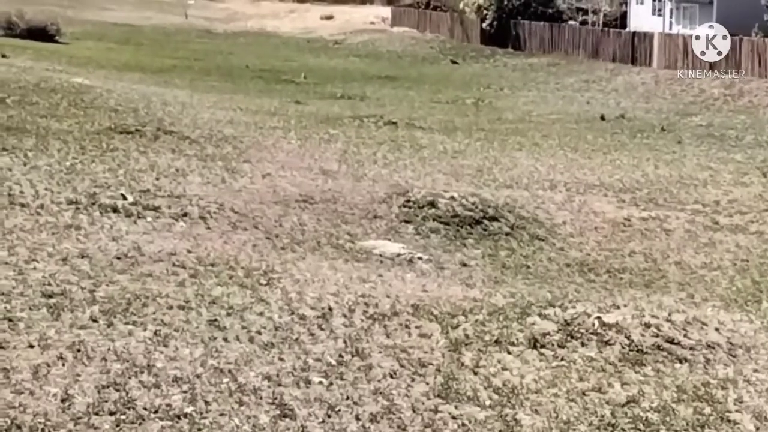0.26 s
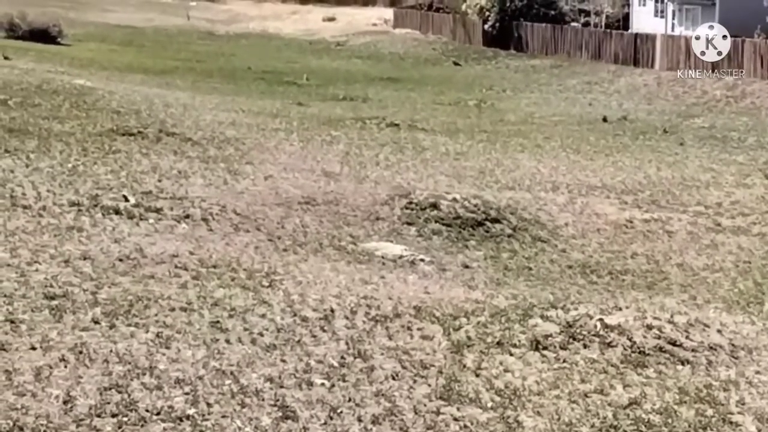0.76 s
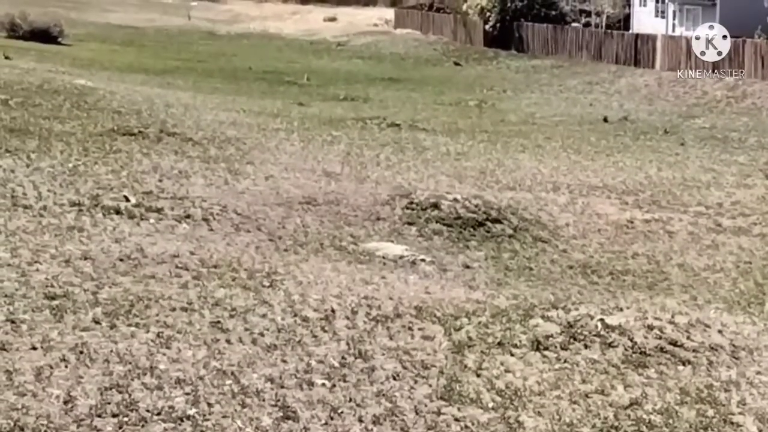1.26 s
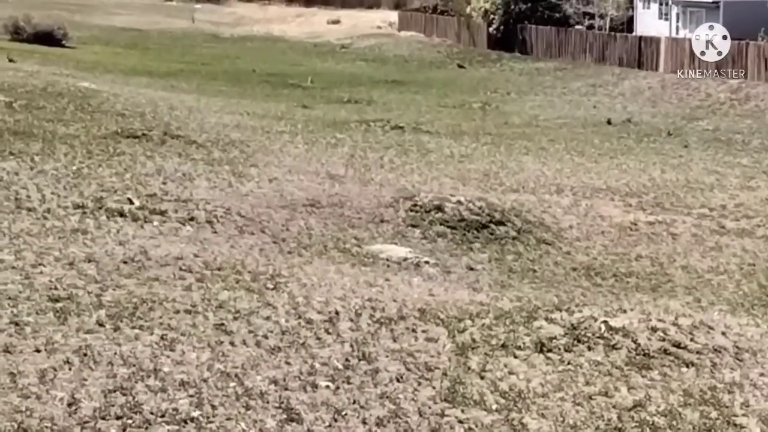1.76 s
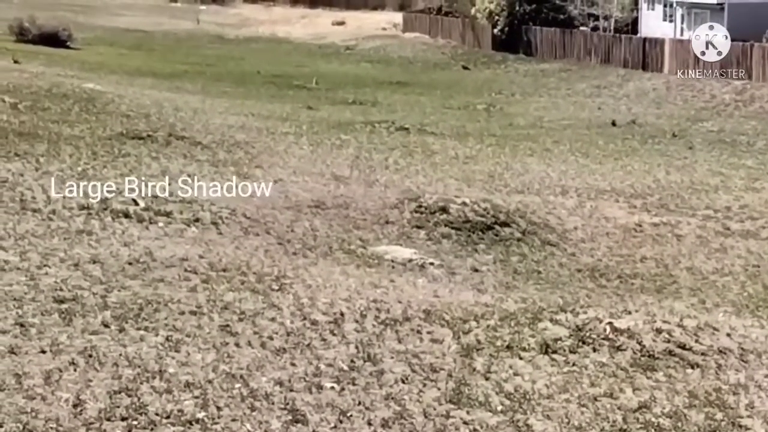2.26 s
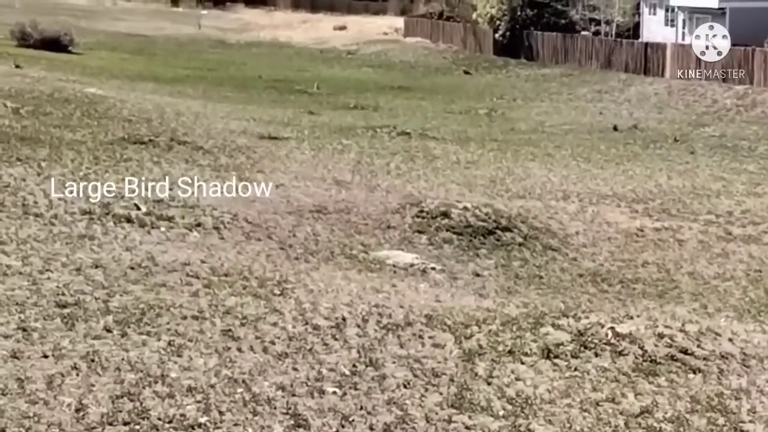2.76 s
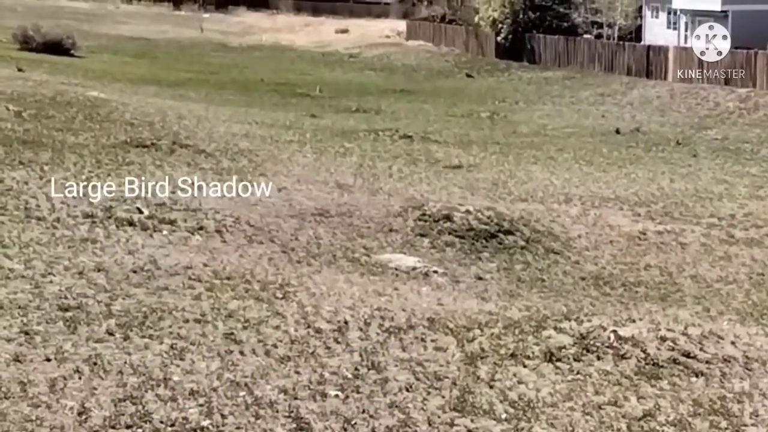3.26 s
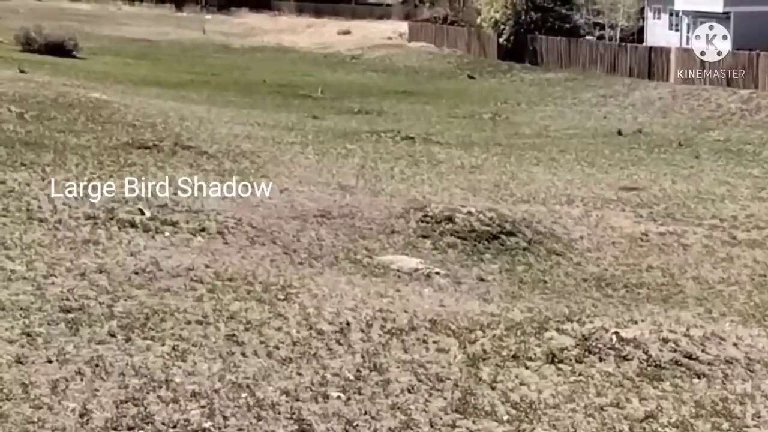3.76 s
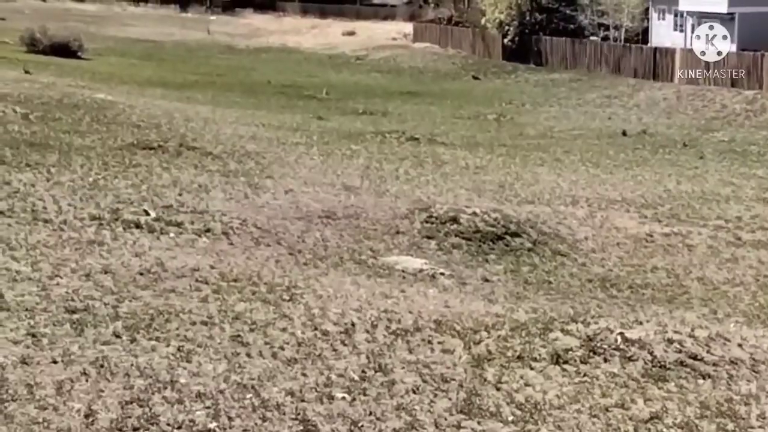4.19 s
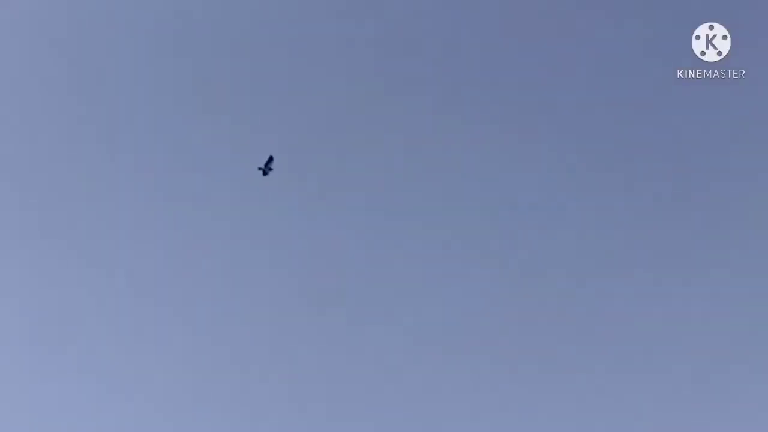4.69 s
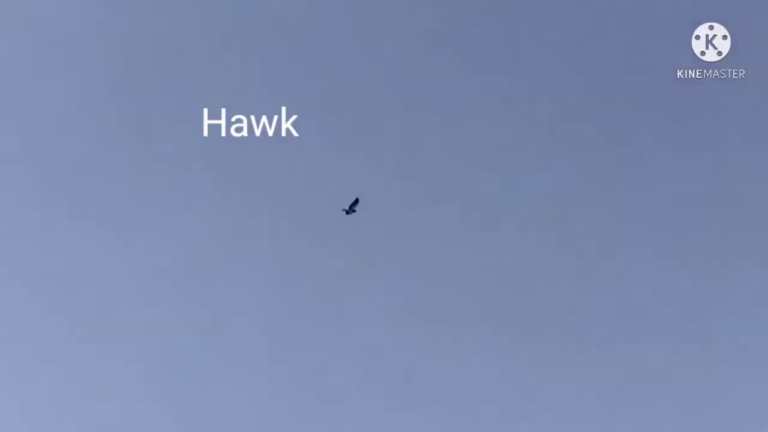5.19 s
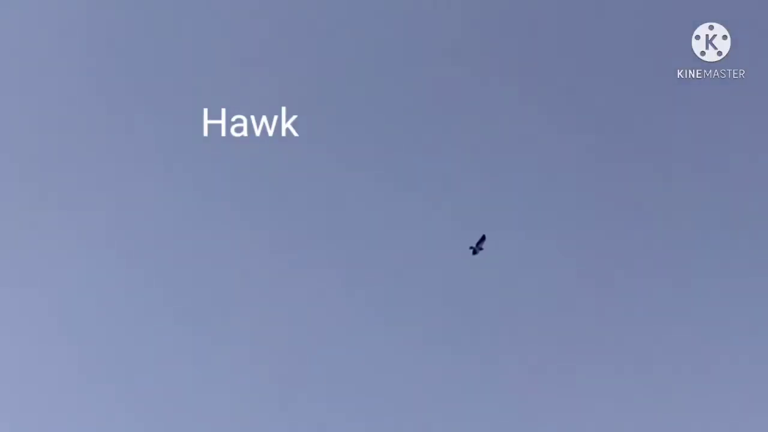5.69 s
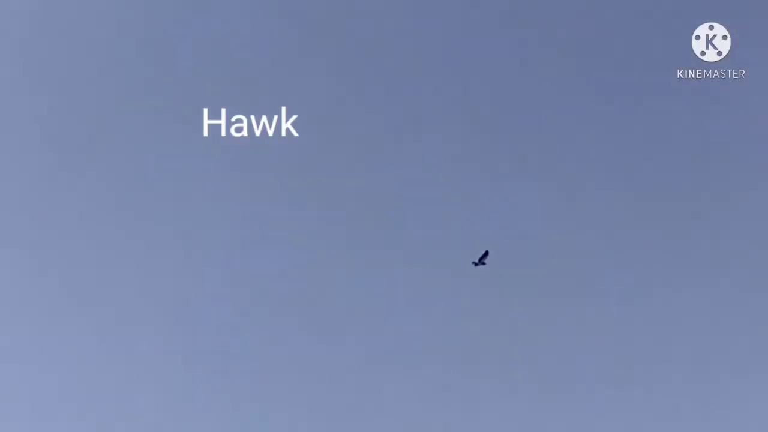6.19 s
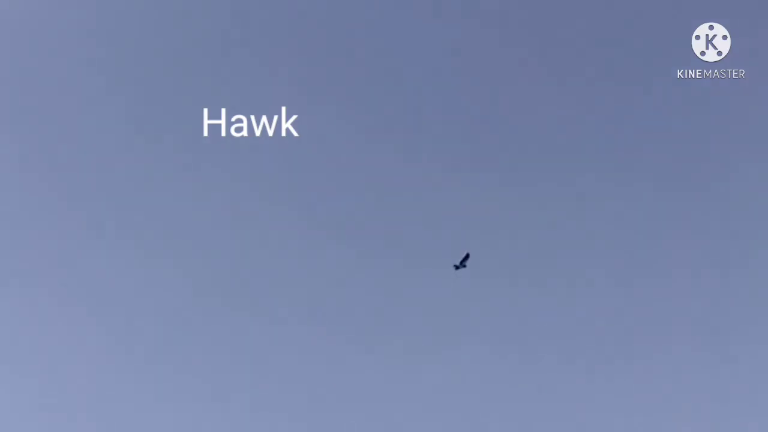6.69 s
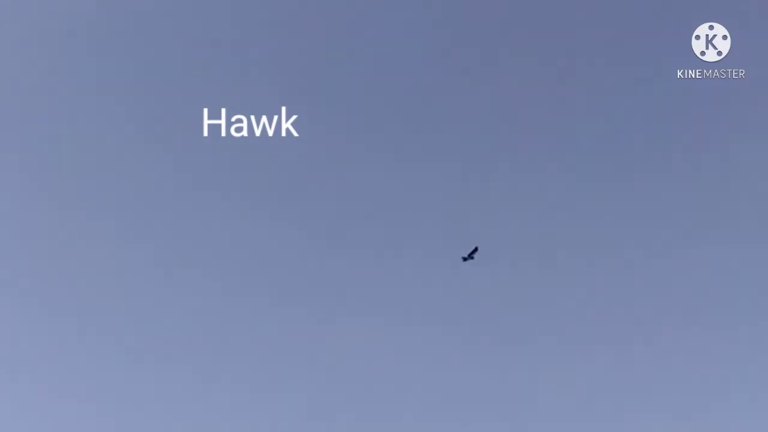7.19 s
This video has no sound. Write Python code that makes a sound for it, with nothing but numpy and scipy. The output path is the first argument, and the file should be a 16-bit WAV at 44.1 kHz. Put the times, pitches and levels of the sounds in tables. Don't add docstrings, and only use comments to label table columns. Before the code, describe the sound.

In an open grassy field, a small ground rodent repeats brief, high alarm barks, each about a tenth of a second with a falling end and faint echoes off fences and houses. Faint chirps answer from afar over a low road drone. Wind thumps the microphone, swelling into hard buffeting near the end.

```python
import sys
import numpy as np
from scipy import signal
from scipy.io import wavfile
from scipy.ndimage import uniform_filter1d

SR = 44100
rng = np.random.default_rng(int(sys.argv[2]) if len(sys.argv) > 2 else 0)


def store_wav(level_fs):
    pcm = np.round(np.clip(np.atleast_2d(level_fs), -1, 1) * 32767)
    wavfile.write(sys.argv[1], SR, pcm.T.astype(np.int16))


def volts_from_db(level):
    exponent = np.asarray(level, float) / 20
    return 10 ** exponent


N = 328412


def rms_one(x):
    return x / np.sqrt(np.mean(x ** 2) + 1e-20)


def in_time(rows):
    s, *columns = np.transpose(rows)
    return [np.interp(np.arange(N) / SR, s, c) for c in columns]


def drift(rate_hz):
    r = np.exp(-80 * np.pi * rate_hz / SR)
    slow = signal.lfilter([1], [1, -2 * r, r * r], rng.standard_normal(N // 40 + 2002))[2000:]
    return np.interp(np.arange(N) / 40, np.arange(len(slow)), rms_one(slow))


def butter(x, hz, kind, order=2):
    return signal.sosfilt(signal.butter(order, hz, kind, fs=SR, output="sos"), x)


def add(out, s, x):
    i = round(s * SR)
    out[i:i + len(x)] += x[:N - i]


def swells(rows, lull_db):
    s, spread_s, db = np.transpose(rows)[:3, :, None]
    t = np.arange(0, N, 40) / SR
    power = volts_from_db(2 * db) * np.exp(-2 * ((t - s) / spread_s) ** 2) + 1e-30
    level_db = 10 * np.log10(volts_from_db(2 * lull_db) + power.sum(axis=0))
    return np.interp(np.arange(N) / 40, np.arange(power.shape[1]), level_db), power


def patchy_noise(spectrum, patchy_db, rate_hz, count):
    hz, db = np.transpose(spectrum)
    edges = np.geomspace(hz[0], hz[-1], count)
    white, out = rng.standard_normal((2, N)), 0
    for k, (low, high) in enumerate(zip(edges, edges[1:])):
        level_db = np.interp(np.log(low * high) / 2, np.log(hz), db)
        band = butter(white[k % 2], [low, high], "band")
        out = out + volts_from_db(level_db + patchy_db * drift(rate_hz)) * band
    return rms_one(out)


# start_s, length_s, top_pitch_hz, final_sag (0-1), second_harmonic_db (rms)
BARKS = [
    (0.747, 0.1, 1647, 0.19, -50),
    (1.918, 0.1, 1695, 0.24, -50.5),
    (2.605, 0.11, 1624, 0.22, -49.5),
    (3.761, 0.11, 1682, 0.24, -47),
    (4.385, 0.064, 1625, 0.2, -62),
    (5.044, 0.1, 1662, 0.21, -50),
    (5.561, 0.11, 1655, 0.31, -44.5),
    (6.64, 0.11, 1676, 0.25, -51),
    (7.205, 0.11, 1662, 0.29, -50),
]
# throat_db (fundamental), open_mouth_db, facing_db (per harmonic above the second),
# aim_at_fences_db
POSES = [
    (-35, 19, -0.6, 10.5),
    (-2.5, -1, -0.7, 8.5),
    (-5, 23, 0.2, 4.5),
    (0.5, 1, -1.5, 4),
    (-12, -8, -2.5, 17),
    (-1, -4, 0, 5),
    (-2.5, 2, -0.5, -1),
    (3, 3.5, 1, 10.5),
    (-1.5, 7, 0, 6),
]
# share_of_bark (0-1), level_db
EFFORT = [(0, -50), (.045, -24), (.08, -8), (.15, -1), (.3, 0), (.68, -1), (.8, -6), (.88, -20), (1.0, -50)]
HARMONICS_DB = [-12, -1, -12.5, -10, -19, -12, -20, -33]


def barks():
    mouth_hz, mouth_width_hz = 7550, 830
    out, k = np.zeros(N), np.arange(1, 9)[:, None]
    for (s, length, top_hz, sag, db), (throat_db, mouth_db, facing_db, _) in zip(BARKS, POSES):
        t = np.arange(round(length * SR)) / SR
        u = t / length
        scoop = .12 * np.exp(-np.maximum(u - .07, 0) / .03)
        hz = top_hz * (1 - scoop - 0.26 * u ** 12 - sag * np.clip(u - .2, 0, 1) ** 1.7)
        phase = 2 * np.pi * np.cumsum(hz) / SR
        effort_db = uniform_filter1d(np.interp(u, *np.transpose(EFFORT)), size=100)
        pose_db = throat_db * (k == 1) + facing_db * np.maximum(k - 2, 0)
        pose_db = pose_db + mouth_db * np.exp(-((k * top_hz - mouth_hz) / mouth_width_hz) ** 2)
        partial_db = np.array(HARMONICS_DB)[:, None] + pose_db
        partial_db = partial_db + effort_db * (0.6 + 0.25 * k) - 2.0 * k * u ** 2
        tired_db = 30 * np.maximum(k - 4, 0) * np.clip(u - .5, 0, 1)
        shimmer = uniform_filter1d(rng.standard_normal((len(k), len(t))), size=160, axis=1)
        shimmer_db = .7 * shimmer * np.sqrt(160 * k) * (1 + 3 * (k == 1))
        partial_db = partial_db - tired_db + shimmer_db
        add(out, s, np.sum(volts_from_db(db + 3.0 + partial_db) * np.sin(k * phase), axis=0))
    return out


def scatter(x):
    t = np.arange(6000) / SR
    response = rms_one(rng.standard_normal(len(t)) * np.exp(-t / .05)) / np.sqrt(len(t))
    tail = butter(signal.fftconvolve(x, response)[:N], 3600, "high")
    return volts_from_db(-17 + 8 * drift(400) - 3.5) * tail


# delay_s, level_db, smear_s
ECHOES = [
    (0.008, -25, 0.03),
    (0.06, -35, .04),
    (.14, -31, .012),
    (.168, -26, .006),
    (.208, -24, .006),
    (.25, -30, .02),
]


def echoes(x):
    out, t = 0, np.arange(6000) / SR
    for delay, db, smear in ECHOES:
        response = np.zeros(round(.4 * SR))
        diffuse = rms_one(rng.standard_normal(len(t)) * np.exp(-t / smear)) / np.sqrt(len(t))
        add(response, delay, volts_from_db(db) * diffuse)
        copy = signal.fftconvolve(x, response)[:N]
        copy = butter(copy, [1300, min(540 / delay, 14000)], "band")
        ruffle_db = 1.1 * drift(6.1) + 3.5 * drift(35) + 2.5 * drift(150) - 1
        out = out + volts_from_db(ruffle_db) * copy
    return out


# start_s, length_s, start_pitch_hz, end_pitch_hz, level_db (rms)
WHISTLES = [(0.214, 0.07, 3243, 3160, -86), (0.64, 0.076, 3300, 3370, -88), (1.01, 0.055, 3850, 3850, -79),
            (1.192, 0.15, 3290, 3420, -90), (1.76, 0.06, 3530, 3520, -88), (3.915, 0.08, 2500, 2930, -85),
            (6.025, .1, 3720, 3700, -75), (6.441, .11, 3600, 3720, -75), (6.824, .05, 3520, 3720, -69),
            (6.872, .05, 3560, 3740, -70), (7.06, 0.06, 3400, 3680, -79), (7.108, .05, 3680, 3740, -73)]
# start_s, length_s, upper_pitch_hz, level_db (rms)
BUZZES = [
    (0.099, 0.061, 4010, -75.5),
    (1.882, 0.1, 4070, -75),
    (3.53, 0.085, 4170, -76),
    (3.619, 0.11, 4140, -92),
]
# start_s, length_s, start_pitch_hz, end_pitch_hz, level_db (rms)
RASPS = [(4.926, 0.18, 1583, 1973, -72.5), (5.435, 0.32, 3530, 3680, -84),
         (5.774, 0.128, 2510, 2625, -78.5), (5.788, 0.099, 2100, 1880, -79.5),
         (5.956, 0.26, 2530, 2743, -78), (5.974, 0.1, 4120, 4200, -87), (6.062, 0.081, 2210, 2060, -77),
         (6.119, .14, 2780, 2560, -87), (6.17, 0.11, 2000, 1990, -80), (6.219, 0.14, 2395, 2170, -76),
         (6.421, 0.12, 2790, 2544, -82.5), (6.763, 0.13, 3010, 3310, -84), (7.2, 0.14, 1172, 1228, -77),
         (7.244, 0.16, 1514, 1390, -72.5)]


def chirps():
    out, grain, flutter = np.zeros(N), drift(65), drift(22)
    grit = drift(140)
    whistle_rough, buzz_rough, rasp_rough = .33, .75, .99
    rows = [(*row, whistle_rough) for row in WHISTLES] + [(*row, rasp_rough) for row in RASPS]
    for s, length, hz, db in BUZZES:
        lower_hz = .94 * hz
        rows.append((s, length, hz, hz, db, buzz_rough))
        rows.append((s, length, lower_hz, lower_hz, db - 3, buzz_rough))
    for k, (s, length, start_hz, end_hz, db, rough) in enumerate(rows):
        u = np.linspace(0, 1, round(length * SR))
        i = k * (N // (len(rows) + 2))
        span = slice(i, i + len(u))
        bend = 1 + .015 * np.sin(np.pi * u) + .008 * flutter[::-1][span]
        hz = (start_hz + (end_hz - start_hz) * np.sqrt(u)) * bend
        chop = (grain if rough < .9 else grit)[span]
        shape = np.minimum(u / 0.23, 1) * (1 - u) ** 0.35 * (1 - rough + rough * chop)
        level = volts_from_db(db + 14.0 + 0.87 * flutter[span])
        add(out, s, level * shape * np.sin(2 * np.pi * np.cumsum(hz) / SR))
    return out


def eddies(at, height, width_s):
    t = np.arange(-300, 300)
    pulses = (height / width_s)[:, None] * np.exp(-(t / SR / width_s[:, None]) ** 2)
    train = np.bincount((at[:, None] + t + 300).ravel(), pulses.ravel(), N + 600)[300:N + 300]
    train = train + volts_from_db(-6) * butter(train, [103, 210], "band", order=1)
    flanked = signal.sosfiltfilt(signal.butter(2, 59.1, "high", fs=SR, output="sos"), train)
    return butter(flanked, 1220, "low", order=5)


# peak_s, peak_db, direction (1 push, -1 pull)
SLAPS = [(0.561, -8, 1), (0.728, -7, 1), (1.004, -9.5, 1), (1.221, -10.5, -1), (1.338, -14, 1),
         (1.443, -5, 1), (1.643, -4, -1), (1.714, -8, -1), (1.796, -7.5, -1), (1.863, -10.5, 1),
         (2.213, -12, 1), (3.22, -9.5, 1), (3.552, -13, -1), (3.712, -16, -1), (4.577, -12.5, -1),
         (4.592, -7, -1), (4.711, -10, 1), (5.027, -9, -1), (5.104, -3.5, -1), (5.136, -3, -1),
         (6.36, -10.5, -1), (6.398, -12, 1), (6.486, 0, -1), (6.501, 1, -1), (6.551, 3, -1),
         (6.578, -0.5, -1), (6.694, 2.5, 1), (6.738, 0.5, 1), (6.778, 3, 1), (7.308, 0, 1), (4.741, -7, -1),
         (4.988, -5, 1), (5.06, -6, -1), (5.091, -18, -1), (5.176, -10, -1), (6.722, -7.5, 1),
         (6.791, -1.5, 1), (6.818, -13, -1), (6.833, -2.5, 1), (6.856, -2, -1), (6.872, -5, 1),
         (6.886, 1.5, -1), (6.896, 3.5, 1), (6.91, 1.5, -1), (6.924, -1, 1), (6.947, 2.5, -1),
         (6.959, -1, -1), (7.004, 2, -1), (7.032, 1, -1), (7.048, -1.5, -1), (7.088, -4.5, 1),
         (7.111, -0.5, -1), (7.137, 0.5, -1), (7.245, -7, -1), (7.277, -7.5, -1)]


def slaps():
    s, db, push = np.transpose(SLAPS)
    width_s = 0.0015 * volts_from_db(-.35 * (db + 11.5))
    return eddies((s * SR).astype(int), 0.23 * volts_from_db(db) * np.sign(push) * width_s, width_s)


def wind(gusts, lull_db, lumpy_db, size_db, sharp, count):
    rumble_db, power = swells(gusts, lull_db)
    sharp_db = np.array(gusts)[:, 3] @ power ** 0.44 / np.sum(power ** 0.5, axis=0)
    when, size, sign, spread = rng.random((count, 4)).T
    at = (when * N).astype(int)
    width_s = sharp * np.sqrt(np.clip(6.5 - sharp_db[at // 40], 2.0, 60)) * (0.78 + 0.73 * spread)
    height = volts_from_db(-size_db * np.log(size + 0.013)) * np.sign(sign - .5)
    boom = rms_one(butter(rng.standard_normal(N), [70, 190], "band", order=3))
    buffeting = rms_one(eddies(at, height, width_s)) + 0.27 * boom
    return volts_from_db(rumble_db + lumpy_db * drift(8.3)) * buffeting


# peak_s, spread_s, rumble_db, sharpness_db
GUSTS_LEFT = [(.2, 0.03, -34.5, -22), (.34, 0.063, -24, -29), (.48, 0.15, -35.5, 2),
              (.75, 0.18, -29.5, -32), (.98, 0.097, -26.5, -26.5), (1.19, 0.067, -27, -28),
              (1.44, 0.11, -33.5, -4.5), (1.66, 0.19, -26.5, -15), (1.85, 0.11, -31, -33.5),
              (2.07, 0.1, -30.5, -17.5), (2.27, 0.15, -32, -17.5), (2.76, 0.059, -30, -42.5),
              (2.8, 0.26, -35.5, -21), (3.02, 0.086, -22.5, -29.5), (3.32, 0.11, -28, -13),
              (3.53, 0.094, -27.5, -25), (3.77, 0.072, -27, -24), (3.84, 0.64, -39.5, -22.5),
              (4.09, 0.047, -37, -28), (4.45, 0.067, -37.5, -16),
              (4.58, 0.065, -35, -4.5), (4.755, 0.1, -37, 2.5), (4.9, 0.13, -40.5, -12),
           (5.018, 0.091, -35.5, 2.5), (5.12, 0.17, -38.5, 1), (5.34, 0.16, -40, -10),
           (5.63, 0.15, -41.5, -33), (5.95, 0.08, -37, -8), (6.119, 0.14, -37.5, -3.5),
           (6.389, 0.049, -34.5, 0), (6.496, 0.043, -30.5, 1), (6.593, 0.068, -27.5, -1),
           (6.711, 0.032, -28.5, 1), (6.79, 0.083, -32, 2), (6.86, 0.091, -27.5, 6.5),
           (7.015, 0.056, -21, -8.5), (7.119, 0.03, -25, -8), (7.269, 0.14, -27, -9.5),
           (7.41, 0.068, -24, -27)]


def open_port_wind():
    return wind(GUSTS_LEFT, -58, lumpy_db=2.0, size_db=0.0, sharp=0.00034, count=2200)


# peak_s, spread_s, rumble_db, sharpness_db
GUSTS_RIGHT = [(.11, 0.12, -64.5, -1.5), (.36, 0.06, -69, -24.5), (.72, 0.39, -64.5, -26.5),
               (1.43, 0.069, -44.5, -23), (1.72, 0.18, -49, -21.5), (2.0, 0.14, -44.5, -10.5),
               (2.3, 0.14, -43.5, -18), (2.63, 0.16, -46, -10.5), (2.95, 0.17, -43, -14.5),
               (3.2, 0.095, -45, -36), (3.45, 0.14, -38, -22.5), (3.85, 0.32, -43.5, -13.5),
               (4.32, 0.23, -49, -5), (4.71, 0.43, -57.5, -23.5), (5.47, 0.34, -61.5, -20.5),
               (6.12, 0.22, -58, -21), (6.89, 0.082, -81, -15), (7.34, 0.14, -66.5, -17)]


def covered_port_wind():
    return wind(GUSTS_RIGHT, -80, lumpy_db=-3.0, size_db=-1.0, sharp=0.00022, count=2000)


# start_s, peak_db, tick_db (against the ring)
BUMPS = [(0.032, -51, 0), (0.152, -60, -50), (4.709, -32.5, -7), (5.076, -47, -2), (5.235, -39, -10),
         (5.448, -36, -6), (5.541, -40.5, -17), (5.992, -47, -7), (6.023, -43, 4), (6.159, -34, -6),
         (6.332, -48, 0), (6.696, -56, -21), (6.853, -67, 7), (7.284, -90, -25)]


def bumps():
    out, t = np.zeros(N), np.arange(6000) / SR
    for (s, db, tick_db), tune in zip(BUMPS, rng.random(len(BUMPS))):
        ring = np.sin(2 * np.pi * (95 + 15 * tune) * t)
        ring = ring * np.exp(-(t / 0.046) ** 2) * np.minimum(t / 0.004, 1)
        tap = volts_from_db(tick_db) * np.exp(-((t - .004) / 0.00063) ** 2)
        add(out, s - .004, volts_from_db(db) * (ring + tap))
    return out


# start_s, peak_db
TICKS = [
    (4.442, -58.5),
    (4.709, -60.5),
    (5.232, -60),
]


def ticks():
    out, t = np.zeros(N), np.arange(800) / SR
    for s, db in TICKS:
        add(out, s, volts_from_db(db) * np.exp(-t / 0.004) * rng.standard_normal(len(t)))
    return butter(out, 2500, "high")


# nearest_s, spread_s, level_db
PASSES = [
    (.7, 1, -64.5),
    (1.4, 0.72, -62),
    (2.7, 0.38, -66),
    (3.3, 0.54, -61.5),
    (3.95, 0.72, -66),
    (5.15, 0.075, -61.5),
    (6.85, 0.14, -65.5),
]
# frequency_hz, level_db (per Hz)
ROAD = [(60, -3.5), (130, 0.5), (300, -27), (500, -10), (800, -9.5), (1100, -10), (1500, -16.5),
        (2200, -29.5), (3500, -57)]


def road():
    level_db = swells(PASSES, -69)[0]
    return volts_from_db(level_db + 7) * patchy_noise(ROAD, patchy_db=4.0, rate_hz=7, count=28)


# start_s, hold_s, level_db
RUSTLES = [
    (0, 0.031, -70),
    (3.197, 0.86, -80.5),
    (4.411, 0.84, -65.5),
    (5.494, 0.52, -75.5),
    (6.052, 0.23, -86),
    (6.462, 0.3, -77.5),
    (7.056, 0.31, -74),
]
# frequency_hz, level_db (per Hz)
LEAVES = [(1200, 8.5), (1800, 3.5), (2300, 5), (2800, 4), (3400, -5), (4000, -5.5), (5500, -41)]


def rustling():
    t = np.arange(N) / SR
    power = volts_from_db(2 * -83.5)
    for s, hold, db in RUSTLES:
        rise = np.clip((t - s) / 0.022, 0, 1) ** 2
        fade_db = 55 * np.maximum(t - s - hold, 0)
        power = power + rise * volts_from_db(2 * (db - fade_db))
    level_db = 10 * np.log10(power)
    return volts_from_db(level_db + 1.5) * patchy_noise(LEAVES, patchy_db=3.4, rate_hz=8, count=24)


# frequency_hz, level_db (rms)
HUM = [(241, -55), (354, -68), (404, -48)]


def machine_hum():
    t = np.arange(N) / SR
    tones = sum(volts_from_db(db - 16.5) * np.sin(2 * np.pi * hz * t) for hz, db in HUM)
    return tones * np.clip((1.6 - t) / 0.55, 0, 1)


# frequency_hz, level_db (per Hz)
HISS_COLOUR = [(300, 10), (1500, 2.5), (5000, -1.5), (11000, 1), (15500, 6)]


def hiss(level_db, masked):
    tile_hz, tile_s = 200, .03
    noise = patchy_noise(HISS_COLOUR, patchy_db=0, rate_hz=1, count=5)
    hz, s, cells = signal.stft(noise, SR, nperseg=1024)
    row, column = (hz / tile_hz).astype(int), (s / tile_s).astype(int)
    shape = (row[-1] + 1, column[-1] + 1)
    level, luck = rng.standard_normal(shape), rng.random(shape)
    tile_masked = np.interp(np.arange(shape[1]) * tile_s, np.arange(N) / SR, masked)
    dropped = luck < .008 + .45 * tile_masked
    gain = volts_from_db(3.5 * level - 25 * dropped)
    mottled = signal.istft(cells * gain[row][:, column], SR, nperseg=1024)[1][:N]
    return volts_from_db(level_db) * rms_one(mottled)


def scene():
    voice = barks()
    calls = chirps()
    aim_db = np.interp(np.arange(N) / SR, np.array(BARKS)[:, 0] + .04, np.array(POSES)[:, 3])
    left = voice + scatter(voice) + calls + echoes(volts_from_db(aim_db) * voice + volts_from_db(12) * calls)
    left = left + slaps() + open_port_wind() + ticks()
    left = left + road() + rustling() + machine_hum()
    right = covered_port_wind() + bumps()
    return np.array([left, right])


def low_pass(x):
    return signal.sosfilt(signal.butter(12, 15500, fs=SR, output="sos"), x)


# start_s, left_db, right_db
HISS = [
    (0, -75, -79),
    (4.35, -75.5, -78),
    (4.5, -75, -82.5),
    (7.45, -76.5, -82),
]


def record(dry):
    bright = uniform_filter1d(butter(dry[0], 2800, "high", order=4) ** 2, size=2000)
    masked = np.clip(bright / volts_from_db(2 * -59), 0, 1)
    noise = [hiss(db, masked) for db in in_time(HISS)]
    fade = np.clip((N - np.arange(N)) / 300, 0, 1)
    overload = .9
    mix = overload * np.tanh((dry + noise) / overload) * fade
    return low_pass(mix)


dry = scene()
out = record(dry)
store_wav(out)
```